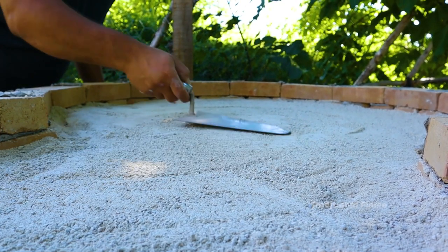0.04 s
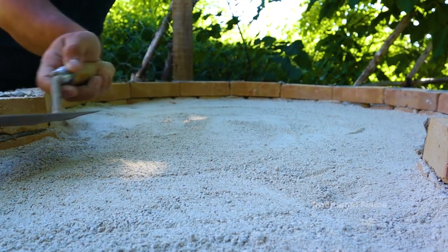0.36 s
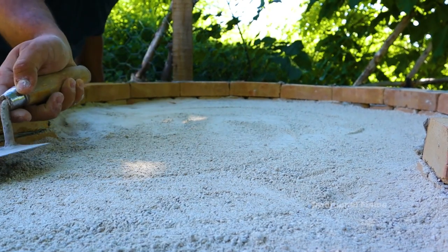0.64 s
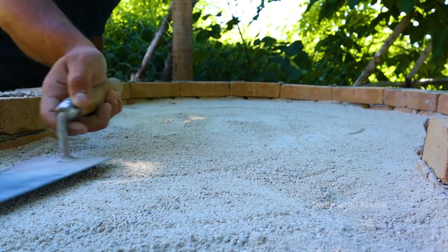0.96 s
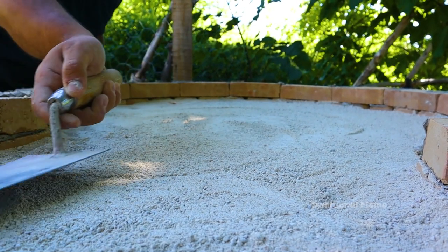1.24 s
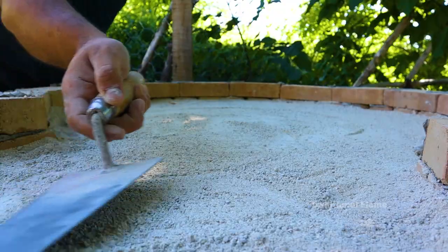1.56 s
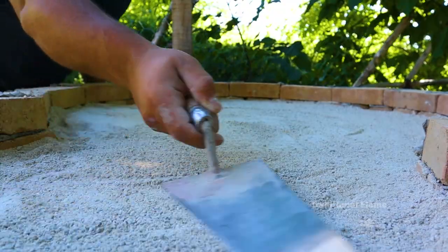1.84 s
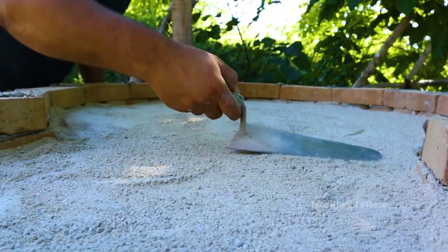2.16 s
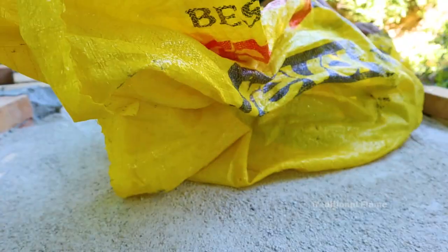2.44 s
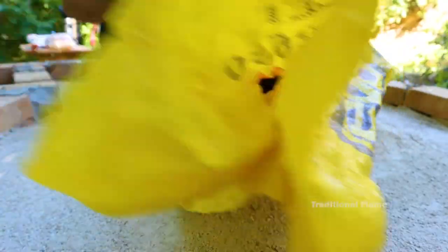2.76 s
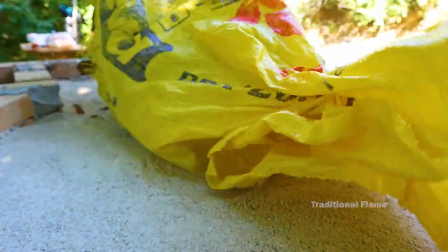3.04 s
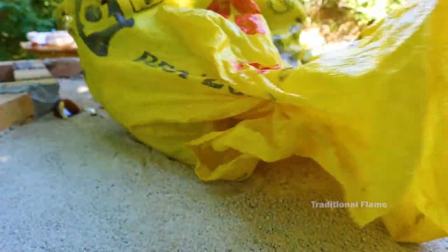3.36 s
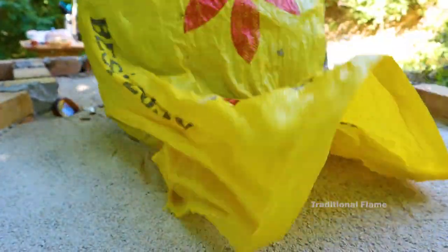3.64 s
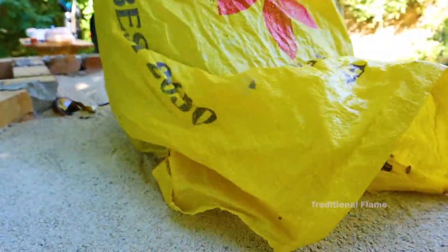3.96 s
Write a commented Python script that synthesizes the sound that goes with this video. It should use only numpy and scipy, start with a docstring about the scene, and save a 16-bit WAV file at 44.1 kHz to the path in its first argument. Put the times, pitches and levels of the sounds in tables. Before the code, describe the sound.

A steel trowel scrapes dry grit close by, outdoors, in three hissing, crunchy strokes: at the start, from 0.5 to 1.2 seconds and from 1.4 to 2.3. The blade knocks near 0.5, 1.5 and 2.2 seconds and rings faintly when lifted. At 2.4 seconds the sound changes abruptly to a woven plastic sack crinkling until 4 seconds, its load sliding with a soft rumble, small clinks and brief squeaks.

```python
"""A steel trowel smooths dry grit close to the microphone: friction makes the grains hiss and crunch and
excites the blade, which knocks down three times and rings freely when lifted. After an abrupt change a
woven plastic sack is tipped about: its creases buckle and crinkle, its load slides and rumbles, and
hard lumps clink and squeak. Outdoors, dry, the same in both ears."""
import sys
import numpy as np
from scipy import signal
from scipy.fft import rfft, irfft
from scipy.io import wavfile
from scipy.ndimage import uniform_filter1d, minimum_filter1d, map_coordinates

SR = 44100
rng = np.random.default_rng(int(sys.argv[2]) if len(sys.argv) > 2 else 0)


def dump(signal):
    """Clip the signal to [-1, 1] and save it as 16-bit WAV at the path in sys.argv[1]."""
    limited = np.clip(np.atleast_2d(signal).T, -1, 1)
    pcm = np.round(limited * 32767).astype(np.int16)
    wavfile.write(sys.argv[1], SR, pcm)


N = 176400
T = np.arange(N) / SR
TOP_HZ, RATTLE_PER_S = 15750, 220
# Spectrum of the sack's folds and small lumps. Each row: frequency in Hz, relative level in dB.
SACK_SPECTRUM = [(300, -20), (1500, -10), (2500, -10), (3000, 1), (3600, -5.5), (5000, -3), (6800, -1),
                 (8400, 2.5), (9500, -1.5), (10400, -7.5), (12500, -2.5), (14000, -5.5), (16000, -7.5)]


def undb(db):
    """Amplitude grows tenfold for every 20 dB."""
    return 10 ** (np.asarray(db) / 20)


def unit(x):
    """Normalisation to an rms of 1."""
    return x / np.sqrt(np.mean(x ** 2))


def through(x, response):
    """A linear system convolves its input with its impulse response."""
    return signal.fftconvolve(x, response)[:N]


def colour(x, points, size=2048):
    """A minimum-phase filter of unit energy follows a spectrum of (Hz, dB) points."""
    hz, db = np.array(points).T
    f = np.maximum(np.arange(size // 2 + 1) * SR / size, 1)
    cepstrum = irfft(np.log(undb(np.interp(np.log(f), np.log(hz), db))))
    cepstrum[1:size // 2] *= 2  # folding the cepstrum makes the filter causal
    cepstrum[size // 2 + 1:] = 0
    response = irfft(np.exp(rfft(cepstrum)))
    return through(x, response / np.linalg.norm(response))


def resonate(x, hz, q):
    """A driven resonator passes a band of width hz / q."""
    return signal.lfilter(*signal.iirpeak(hz, q, fs=SR), x)


def scatter(x, wet_db, t60):
    """Many dense echoes or modes merge into a tail of decaying noise."""
    tail = rng.standard_normal(N) * np.exp(-np.log(1000) * T / t60) * (T > .001)
    return x + undb(wet_db) * through(x, tail / np.linalg.norm(tail))


def ring(hz, t60):
    """A damped mode is a sine that falls 60 dB in t60 seconds."""
    t = T[:int(min(t60, 1) * SR) + 2]
    return np.sin(2 * np.pi * hz * t) * np.exp(-np.log(1000) * t / t60)


def add(out, start, sound):
    """Superposition: a sound joins the mix at its start in seconds."""
    i = min(int(start * SR), N)
    out[i:i + len(sound)] += sound[:N - i]


def notes(rows):
    """Each impact excites one damped mode."""
    out = np.zeros(N)
    for start, hz, db, t60 in rows:
        add(out, start, undb(db) * ring(hz, t60))
    return out


def walk(rate):
    """Low-passed noise of rms 1 wanders about rate times a second."""
    width = max(int(SR / rate), 2)
    return unit(uniform_filter1d(uniform_filter1d(rng.standard_normal(N), width), width))


def grains(per_s, spread_db):
    """Shot noise of rms 1: independent clicks of random size and sign."""
    size = undb(spread_db * np.minimum(rng.exponential(size=N), 6))
    return unit((rng.random(N) < per_s / SR) * size * rng.choice([-1, 1], N))


def levels(rows):
    """Interpolation in decibels gives one envelope for each level column."""
    times, *columns = np.array(rows).T
    return [undb(np.interp(T, times, db)) for db in columns]


def burst(start, db, decay):
    """A blow releases dense clicks that die away exponentially."""
    envelope = (T >= start) * undb(db) * np.exp(-np.maximum(T - start, 0) / decay)
    return envelope * grains(SR / 2, spread_db=-0.5)


def ticks(rows, spectrum, decay_s):
    """The harder a brief contact, the more its spectrum tilts towards the treble."""
    out = np.zeros(N)
    for start, db, tilt in rows:
        tilted = [(hz, level + tilt * np.log2(hz)) for hz, level in spectrum]
        out += colour(burst(start, db, decay_s), tilted)
    return out


def tinkle(centre_hz, octaves, t60, spread_db, count):
    """Random collisions each excite one brief mode of a small hard piece; rms 1."""
    out = np.zeros(N)
    for (when, size), (pitch, length) in zip(rng.random((count, 2)), rng.standard_normal((count, 2))):
        hz = centre_hz * 2 ** (octaves * pitch)
        db = spread_db * min(-np.log(1 - size), np.pi)
        if hz < TOP_HZ:
            add(out, when * T[-1], undb(db) * ring(hz, t60 * 2 ** (length / 2)))
    return unit(out)


def scrape():
    """Friction: grit slips under the juddering blade in thousands of tiny impacts."""
    # Three strokes. Each row: time in seconds, levels of hiss, crunch and low grinding in dB.
    strokes = [
        [(0, -29.5, -40, -53), (0.042, -25.5, -37.5, -56.5), (0.07, -35.5, -47, -57), (0.125, -36.5, -50, -60),
         (0.16, -40, -64, -64), (0.205, -55, -75, -84), (0.245, -55, -76, -73), (0.29, -49, -64, -65),
         (0.335, -58, -80, -74), (0.385, -67, -92, -79), (0.48, -68, -76, -80)],
        [(0.545, -40, -69, -62), (0.58, -30.5, -54, -57), (0.645, -44.5, -76, -73), (0.7, -41.5, -61, -63),
         (0.755, -41.5, -61, -64), (0.812, -45.5, -63, -53.5), (0.86, -42, -63, -61), (0.91, -39.5, -58, -59),
         (0.98, -33, -50, -55.5), (1.07, -31.5, -49.5, -52), (1.115, -25.5, -39.5, -46.5),
         (1.17, -25.5, -39, -57), (1.205, -37.5, -54, -71), (1.25, -59, -79, -77), (1.31, -65, -68, -73)],
        [(1.425, -69, -76, -75), (1.44, -42, -55, -71), (1.51, -35.5, -43.5, -55.5), (1.585, -31.5, -54, -57),
         (1.62, -32, -52, -65), (1.72, -31.5, -51.5, -63.5), (1.83, -29.5, -48, -56), (1.94, -28.5, -34.5, -53),
         (1.98, -32.5, -39.0, -54), (2.07, -28, -32.5, -46), (2.17, -29.5, -38.5, -50),
         (2.225, -29.5, -34, -53), (2.3, -27.5, -40.5, -57), (2.35, -36, -55, -73)],
    ]
    # Spectra of the grit. Each row: frequency in Hz, relative level in dB.
    hiss_spectrum = [(200, -34), (900, -26.5), (1900, -5), (2500, -4), (3400, -6.5), (5000, -0.5),
                     (6200, 5), (7800, 0), (9600, 0), (10400, -1), (12200, 2.5), (13400, 3.5),
                     (15000, -2.5), (16000, 7)]
    crunch_spectrum = [(300, -25.5), (700, -10), (1200, -1), (1650, -0.5), (2300, -11), (4000, -14.5),
                       (8000, -23)]
    grind_spectrum = [(40, -40), (120, -16), (300, -5.5), (520, 2.5), (800, -1.5), (1600, -19)]
    hiss_gain, crunch_gain, grind_gain = levels(np.vstack(strokes))
    judder = undb(1.5 * walk(rate=54))
    grit = lambda spectrum: colour(judder * grains(per_s=18000, spread_db=2.5), spectrum)
    hiss = undb(-0.5) * hiss_gain * pressed_blade(grit(hiss_spectrum))
    crunch = undb(0.5) * crunch_gain * pressed_blade(grit(crunch_spectrum))
    grind = undb(-1) * grind_gain * grit(grind_spectrum)
    return hiss + crunch + grind


def pressed_blade(x):
    """Forced vibration: the blade's resonances, damped by grit, give the scrape its steel colour."""
    # Damped resonances. Each row: frequency in Hz, bandwidth in Hz, gain in dB.
    resonances = [(930, 100, -3), (1204, 73, 0), (1385, 140, 1.5), (1684, 74, -6.5), (1930, 135, -4),
                  (2370, 125, -5), (2520, 160, -4), (3093, 150, 2.5), (3660, 400, -2.5), (4390, 96, -3),
                  (5100, 370, -8), (7100, 110, -4.5), (7860, 135, 0.5), (8730, 440, -3), (9630, 260, -4.5),
                  (11400, 540, -9.5), (13100, 1100, -9.5)]
    out = undb(-6) * x  # the share that does not resonate
    for hz, width, db in resonances:
        out += undb(db) * resonate(x, hz, hz / width)
    with_fine_modes = scatter(out, wet_db=-5, t60=.05)
    return unit(flexing(with_fine_modes))


def flexing(x, above_hz=5500, pitch_share=.008):
    """Frequency modulation: the blade bends as it travels, so its high resonances wander."""
    low = signal.sosfiltfilt(signal.butter(6, above_hz, fs=SR, output="sos"), x)
    warped_index = np.arange(N) + np.cumsum(pitch_share * walk(rate=9))
    return low + map_coordinates(x - low, [warped_index], order=5, mode="mirror")


def pings():
    """Loose grains rebound from the blade, each impact ringing high and briefly."""
    # Envelope of the pings. Each row: time in seconds, level in dB.
    envelope = [(.2, -78), (.29, -54.5), (.4, -66), (.5, -86), (.56, -54), (.7, -45), (.8, -62), (1.0, -63),
                (1.25, -84), (1.45, -61), (2.35, -45)]
    return levels(envelope)[0] * tinkle(centre_hz=9300, octaves=0.44, t60=0.025, spread_db=0.5, count=600)


def air():
    """Still outdoor air is faint broadband noise, strongest in the bass."""
    # Each row: frequency in Hz, relative level in dB.
    spectrum = [(25, -8), (60, -2), (150, -0.5), (500, -5.5), (2000, -7), (7000, -9), (16000, -43)]
    return undb(-65.5) * colour(rng.standard_normal(N), spectrum)


def free_blade():
    """Free vibration: lifted clear of the damping grit, the steel rings in its natural modes."""
    # Modes of the free blade. Each row: frequency in Hz, level in dB, t60 in seconds.
    modes = [(1225, -44, 0.58), (1394, -49.5, 0.7), (1750, -48, 1.36), (2003, -50.5, .87),
             (2280, -54.5, 1.3), (2627, -44.5, 0.61), (4100, -54, 0.42), (4398, -54, .9), (4930, -54, 0.8),
             (5220, -44.5, 0.84), (5930, -43, 0.62), (6100, -45, 0.46), (7750, -44, 0.24),
             (8600, -50, 0.52)]
    # Lifts. Each row: start in seconds, gain in dB.
    lifts = [(0.151, -14.5), (1.17, -3.5), (2.29, -8)]
    chord = notes([(0, hz, db, t60) for hz, db, t60 in modes])
    out = np.zeros(N)
    for start, db in lifts:
        add(out, start, undb(db) * chord)
    return out


def taps():
    """Stray grains touch the blade so briefly that each tap is broadband."""
    # Taps. Each row: start in seconds, level in dB, tilt in dB per octave.
    contacts = [(0.26, -37, -1), (0.3535, -39.5, 6), (0.8, -30.5, 7), (.821, -42, -4), (.8265, -37, -1),
                (.829, -29, 0.5), (1.024, -25, 6), (1.034, -26.5, 6), (1.3405, -39, -3.5)]
    # Spectrum of a tap. Each row: frequency in Hz, relative level in dB.
    spectrum = [(100, -40), (500, -4.5), (1300, 2), (4500, 1), (7500, 4.5), (11000, -6.5), (16000, -19)]
    return ticks(contacts, spectrum, decay_s=0.0023)


def knocks():
    """Impact crushes grit and excites the blade's edge, at a pitch set by where the blow lands."""
    # Each row: start in seconds, level in dB, decay in seconds, relative chink level in dB, pitch ratio.
    blows = [(.5063, -12, 0.0065, -16, 0.7), (0.5165, -22, 0.017, -5, 1.24), (1.5277, -32, 0.0088, 12, 1.1),
             (1.5334, -15, 0.004, 1.5, 1.04), (1.537, -19, 0.0045, 5, 0.94), (1.547, -28, 0.0036, -8, .9),
             (1.5485, -23.5, 0.0058, 5.5, 1.04), (2.2408, -26, 0.0043, 6, 1.08),
             (2.2488, -20, 0.0082, -20, 1.03), (2.2528, -22, 0.011, 0, 1.17), (2.267, -23, 0.011, -10, 1.4)]
    # Spectrum of crushed grit. Each row: frequency in Hz, relative level in dB.
    crush_spectrum = [(60, -19), (300, -20.5), (750, -14.5), (1900, -15), (2700, 1.5), (3100, -5),
                      (3550, 2), (4300, -12.5), (5500, -0.5), (6600, 6), (8800, -5), (10300, -2.5),
                      (11700, 0.5), (13500, -8.5), (16000, -24)]
    # Resonances of the edge. Each row: frequency in Hz, bandwidth in Hz (both at ratio 1), gain in dB.
    edge_modes = [(3200, 1130, -2.5), (7220, 940, 3.5), (11000, 500, 0)]
    crush, chink = np.zeros(N), np.zeros(N)
    for start, db, decay, chink_db, pitch in blows:
        crush += burst(start, db, decay)
        noise = rng.standard_normal(N // 20)
        edge = sum(undb(gain) * resonate(noise, hz * pitch, hz / width) for hz, width, gain in edge_modes)
        add(chink, start, undb(db + chink_db) * unit(edge) * np.exp(-T[:len(edge)] / decay))
    return scatter(colour(crush, crush_spectrum) + chink, wet_db=-12.5, t60=0.07)


def bumps():
    """The settling blade excites low damped modes that sound hollow."""
    # Bumps. Each row: start in seconds, frequency in Hz, level in dB, t60 in seconds.
    impacts = [(.508, 734, -45, 0.23), (.574, 745, -40.5, 0.062), (.728, 780, -50.5, 0.1),
               (1.546, 1120, -35.5, 0.11)]
    return notes(impacts)


def bounces():
    """A few larger grains bounce and ring at their natural frequencies."""
    # Bounces. Each row: start in seconds, frequency in Hz, level in dB, t60 in seconds.
    impacts = [(.6855, 11500, -34, .05), (.7025, 10280, -31.5, 0.093), (1.915, 11550, -28, .08),
               (2.29, 12100, -32, .07)]
    return notes(impacts)


def sack():
    """Amplitude modulation: the sack's movement sets the level of its folds, load and small lumps."""
    # Movement. Each row: time in seconds, level of crinkling in dB, level of the sliding load in dB.
    movement = [(2.375, -55, -54.5), (2.41, -52, -52), (2.48, -46, -47.5), (2.6, -40.5, -44),
                (2.67, -41.5, -42), (2.73, -39, -40.5), (2.83, -37.5, -38), (2.87, -37.5, -37),
                (2.91, -32, -36.5), (2.98, -27, -38), (3.04, -30, -46), (3.11, -36, -52.5), (3.2, -34, -49),
                (3.275, -34.5, -56.5), (3.32, -39.5, -48.5), (3.39, -41, -46.5), (3.45, -33.5, -42),
                (3.53, -33, -40), (3.57, -28, -38), (3.64, -30, -43.5), (3.71, -31, -46),
                (3.765, -28, -52.5), (3.86, -34.5, -51), (3.92, -35.5, -51.5), (3.97, -32.5, -50),
                (3.995, -34, -50)]
    motion, slide = levels(movement)
    flutter = unit(undb(walk(rate=48)))
    return crinkle(motion, flutter) + sliding_load(slide * flutter) + small_lumps(motion)


def crinkle(motion, flutter):
    """Buckling: plastic creases give way in quick bunches over the fine crackle of the weave."""
    bunches = undb(4 * np.clip(walk(rate=60), -2, 1))
    buckles = bunches * grains(per_s=380, spread_db=2.5)
    creases = undb(-5.5) * unit(scatter(buckles, wet_db=2, t60=.005))
    weave = undb(-3) * flutter * grains(per_s=5000, spread_db=1.5)
    return colour(motion * (weave + creases), SACK_SPECTRUM)


def sliding_load(slide):
    """Granular flow: the many contacts of the sliding load merge into a rumble."""
    # Spectrum of the load. Each row: frequency in Hz, relative level in dB.
    spectrum = [(30, -13), (90, -12.5), (160, -3), (300, 1.5), (480, 1.5), (700, 4.5), (1100, 0), (2200, 1),
                (4500, -0.5), (9000, -15.5)]
    return undb(3.5) * colour(slide * grains(per_s=2300, spread_db=1.5), spectrum)


def small_lumps(motion):
    """Collisions set small lumps ringing, louder as the sack moves more."""
    collisions = tinkle(centre_hz=10300, octaves=.55, t60=0.045, spread_db=4.5, count=4400)
    return colour(undb(-4) * motion * collisions, SACK_SPECTRUM)


def clinks():
    """Each hard lump, when struck, rings at its own natural frequency."""
    # Clinks. Each row: start in seconds, frequency in Hz, level in dB, t60 in seconds.
    impacts = [(2.3899, 8690, -33, 0.062), (2.69, 2910, -31.5, 0.089), (2.782, 9700, -24, 0.024),
               (2.8164, 2980, -28, .05), (2.9571, 9820, -23, .08), (2.996, 4600, -23, 0.025),
               (3.055, 6800, -21.5, 0.065), (3.093, 8240, -22, 0.042), (3.126, 5620, -27, 0.044),
               (3.1606, 13000, -31, 0.046), (3.2317, 3810, -20, 0.056), (3.233, 2835, -32.5, 0.23),
               (3.3153, 8550, -37, 0.08), (3.342, 8060, -22, 0.015), (3.36, 10900, -29, .03),
               (3.418, 12700, -29.5, 0.11), (3.497, 12695, -27, .08), (3.594, 4120, -24.5, 0.051),
               (3.766, 7562, -27, 0.11)]
    return notes(impacts)


def snaps():
    """A fold buckles all at once and radiates a sharp broadband crack."""
    # Snaps. Each row: start in seconds, level in dB, tilt in dB per octave.
    folds = [(2.547, -35, 5), (2.6148, -41, -1), (2.664, -27.5, -2.5), (2.8982, -22, 7), (2.934, -24, 1),
             (3.054, -22, 3), (3.23, -28.5, 3), (3.341, -25, 5), (3.558, -24, -3.5), (3.749, -19.5, 7)]
    # Spectrum of a snap. Each row: frequency in Hz, relative level in dB.
    spectrum = [(60, -34), (160, -8), (350, -6.5), (800, 6), (2000, 1.5), (8000, -2.5), (16000, -11.5)]
    return ticks(folds, spectrum, decay_s=0.0045)


def squeaks(edge_s=0.003, sag_db=9.5):
    """Friction sustains a tone between rubbing lumps; its level sags until the contact ends."""
    # Rubs. Each row: start in seconds, frequency in Hz, initial level in dB, length in seconds.
    rubs = [(2.756, 8615, -27, 0.034), (2.84, 8150, -31.5, .04), (2.885, 8480, -31, 0.036),
            (3.026, 4696, -28.5, 0.035), (3.051, 4710, -23.5, 0.044), (3.052, 3122, -24, 0.077),
            (3.123, 3160, -28, 0.033), (3.447, 7300, -30, 0.032), (3.553, 3120, -29, 0.048),
            (3.555, 8400, -28, 0.067), (3.603, 12700, -28, 0.037), (3.607, 3128, -25, 0.04),
            (3.709, 2930, -30, 0.018), (3.719, 3135, -31, 0.048)]
    out = np.zeros(N)
    waver = 1 + .002 * walk(RATTLE_PER_S)
    for start, hz, db, length in rubs:
        t = T[:int((length + edge_s) * SR)]
        gate = np.clip(np.minimum(t, t[-1] - t) / edge_s, 0, 1)
        pitch_ratio = np.roll(waver, -int(start * SR))[:len(t)]
        phase = 2 * np.pi * hz * np.cumsum(pitch_ratio) / SR
        add(out, start, gate * undb(db - sag_db * t / length) * np.sin(phase))
    return out


def scene():
    """Superposition: the trowel, then the sack, each with short ground reflections, over still air."""
    trowel_ends_s, sack_starts_s = 2.3615, 2.371
    outdoors = lambda x: scatter(x, wet_db=-16.5, t60=0.045)
    trowel = scrape() + pings() + free_blade() + taps() + knocks() + bumps() + bounces()
    rattle = 1 + .35 * walk(RATTLE_PER_S)
    tipping = sack() + snaps() + rattle * (clinks() + squeaks())
    mono = outdoors(trowel) * (T < trowel_ends_s) + outdoors(tipping) * (T > sack_starts_s) + air()
    return np.array([mono, mono])


def record(dry):
    """Band and peak limiting: the deepest bass is shed, peaks are held down, the top is cut steeply."""
    low_cut_hz, ceiling = 16, .33
    x = signal.sosfilt(signal.butter(2, low_cut_hz, "high", fs=SR, output="sos"), dry)
    gain = ceiling / np.maximum(np.abs(x[0]), ceiling)
    gain = uniform_filter1d(minimum_filter1d(gain, size=65), size=65)
    return signal.sosfilt(signal.ellip(12, .1, 80, TOP_HZ, fs=SR, output="sos"), x * gain)


dry = scene()
out = record(dry)
dump(out)
```